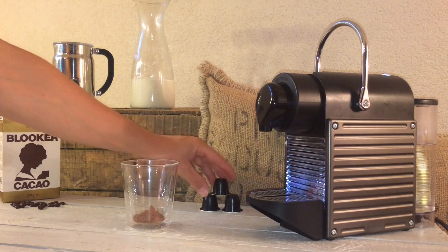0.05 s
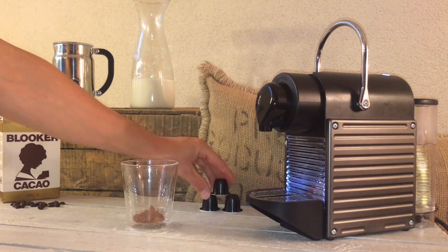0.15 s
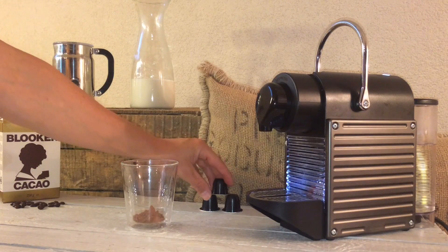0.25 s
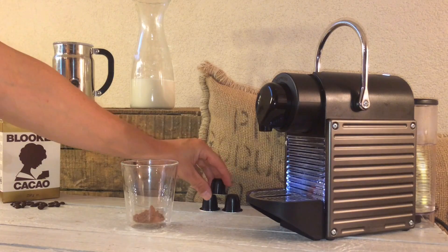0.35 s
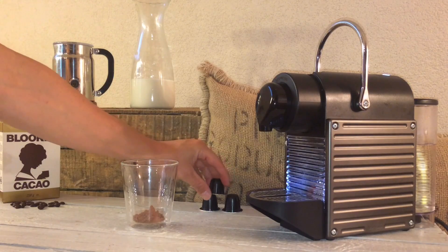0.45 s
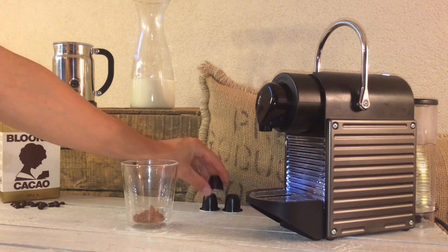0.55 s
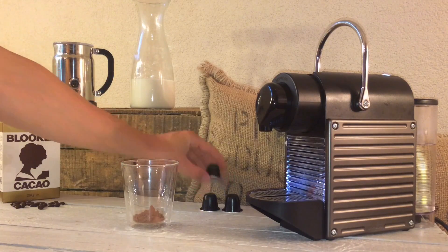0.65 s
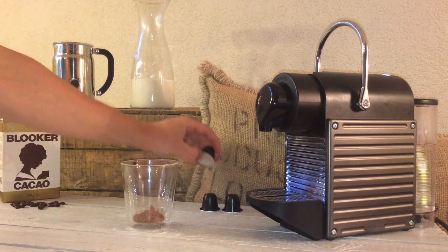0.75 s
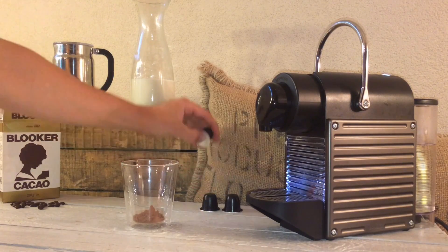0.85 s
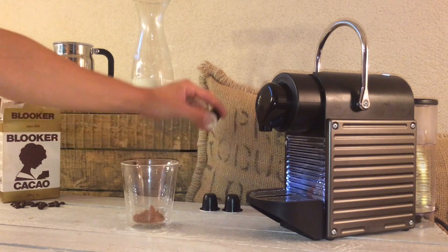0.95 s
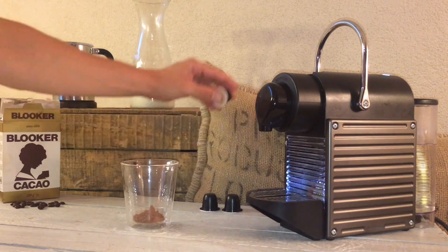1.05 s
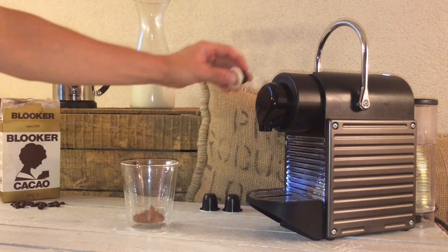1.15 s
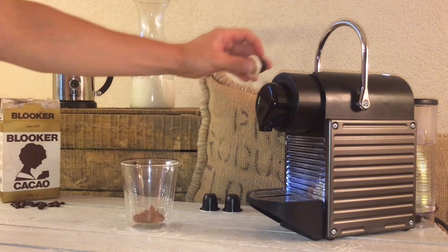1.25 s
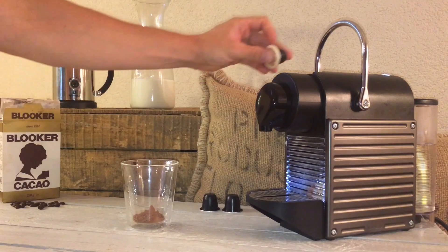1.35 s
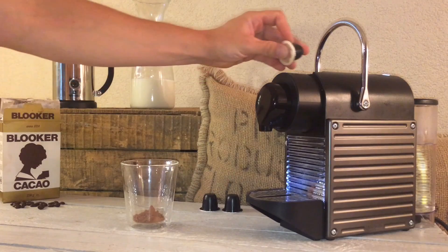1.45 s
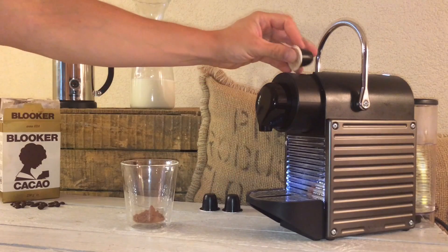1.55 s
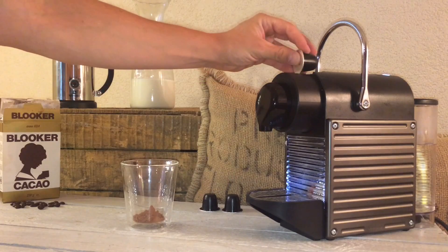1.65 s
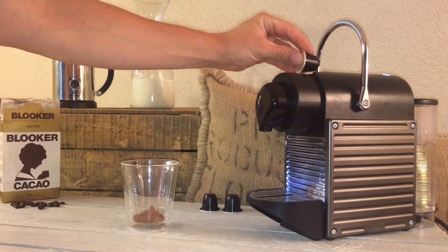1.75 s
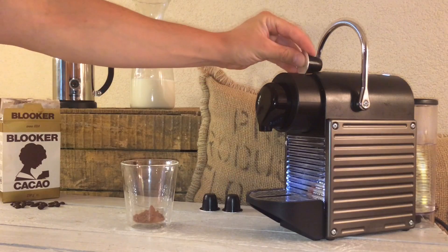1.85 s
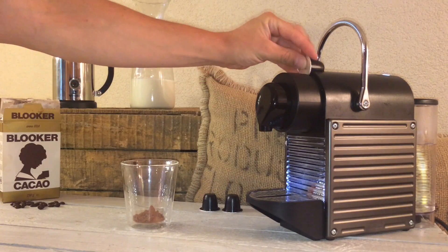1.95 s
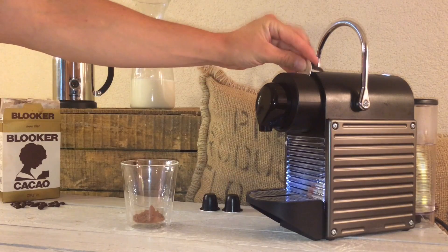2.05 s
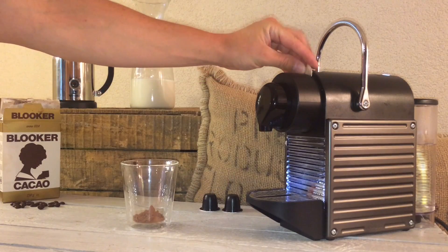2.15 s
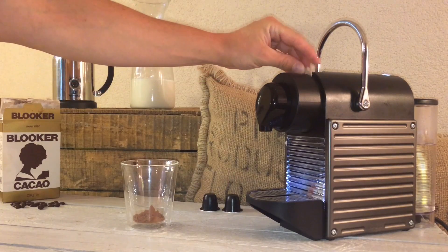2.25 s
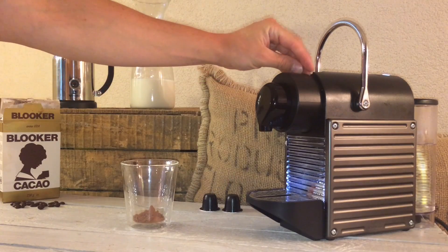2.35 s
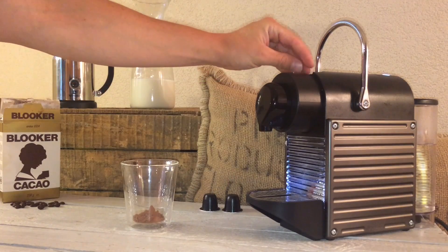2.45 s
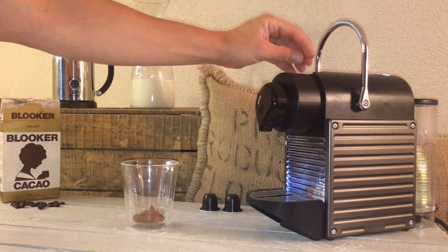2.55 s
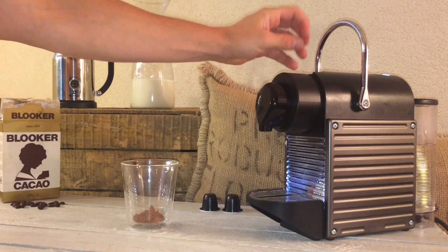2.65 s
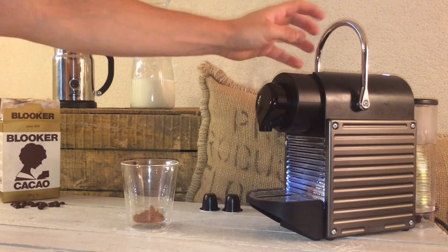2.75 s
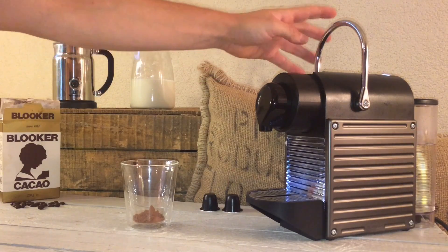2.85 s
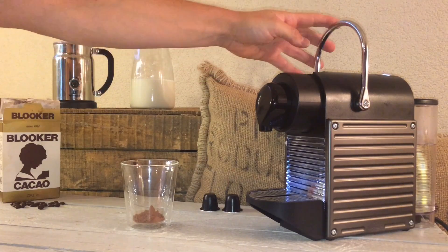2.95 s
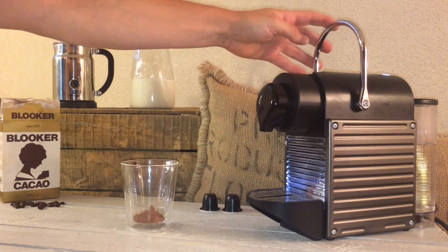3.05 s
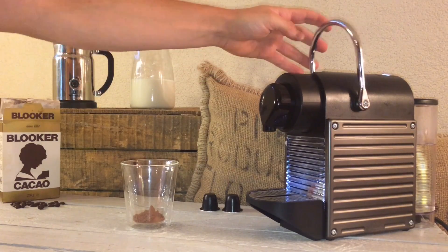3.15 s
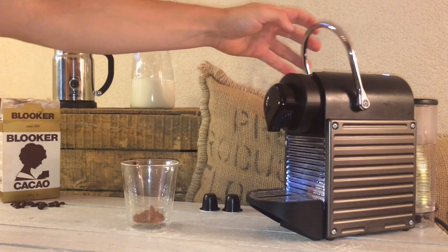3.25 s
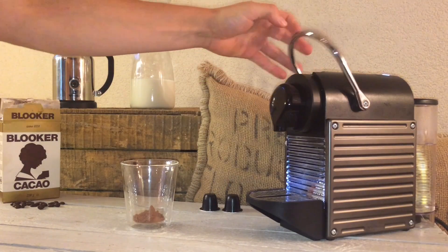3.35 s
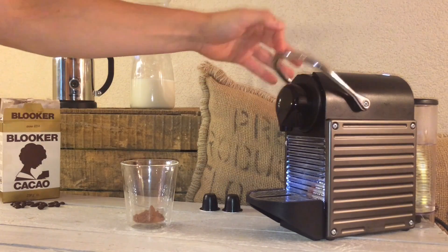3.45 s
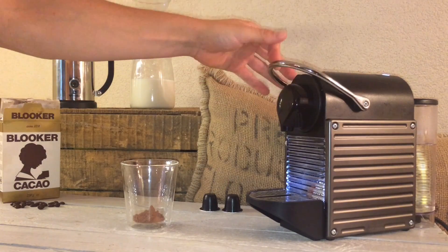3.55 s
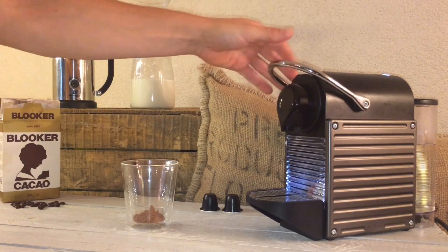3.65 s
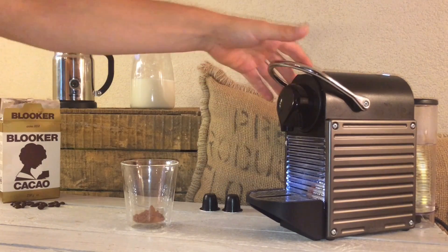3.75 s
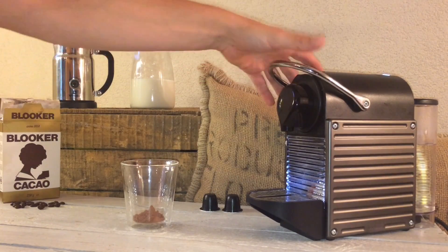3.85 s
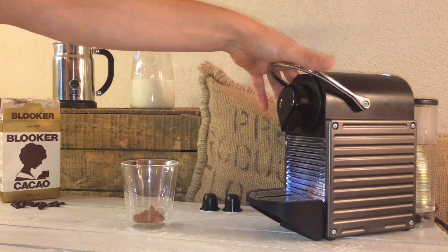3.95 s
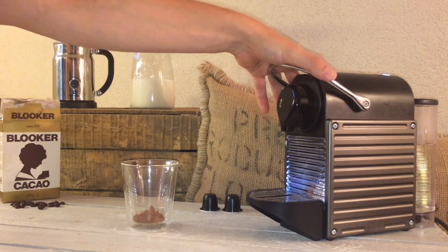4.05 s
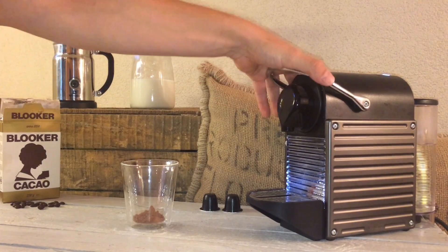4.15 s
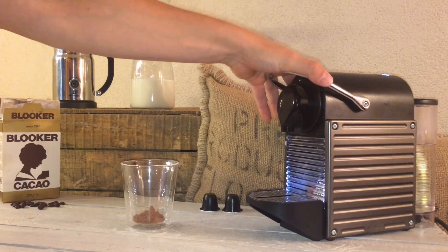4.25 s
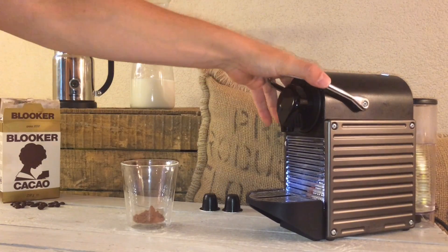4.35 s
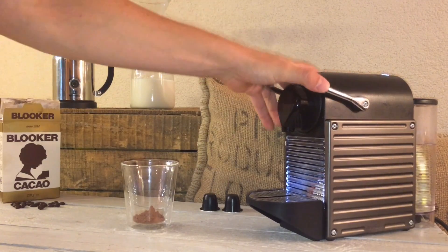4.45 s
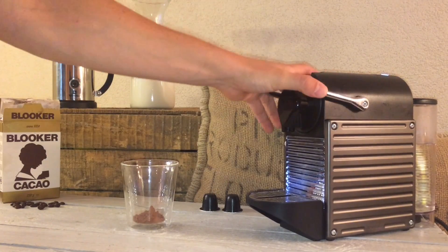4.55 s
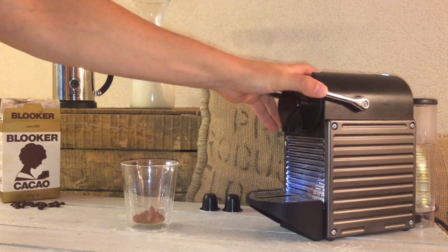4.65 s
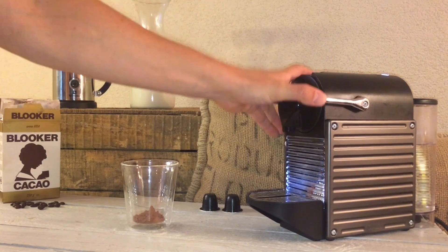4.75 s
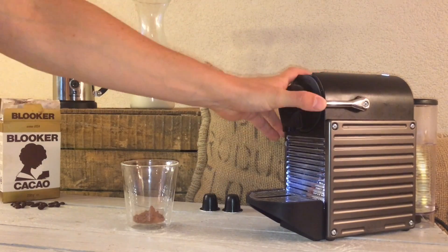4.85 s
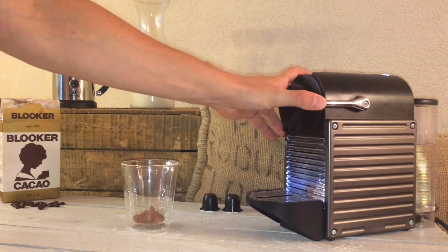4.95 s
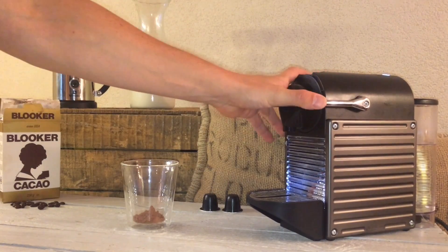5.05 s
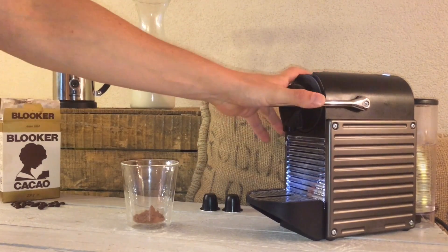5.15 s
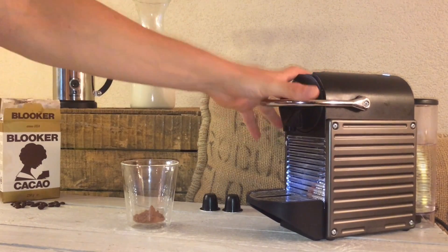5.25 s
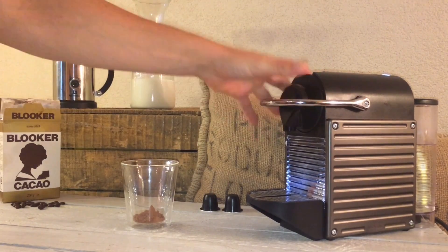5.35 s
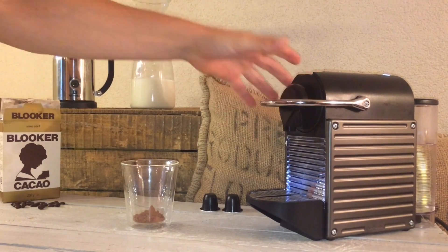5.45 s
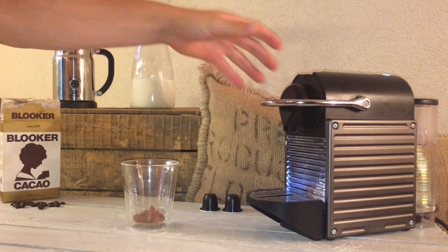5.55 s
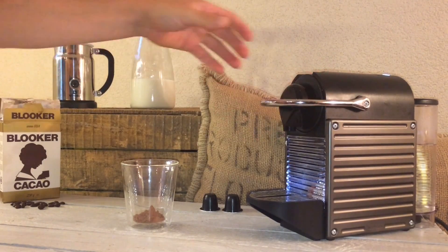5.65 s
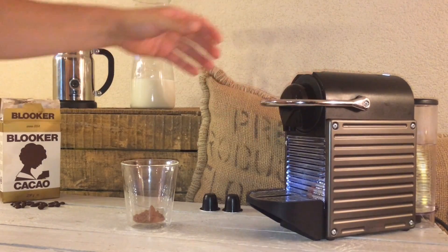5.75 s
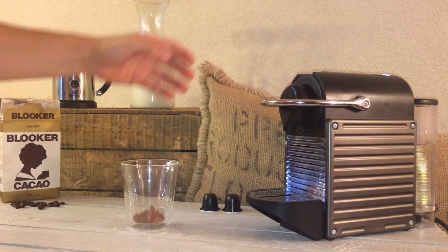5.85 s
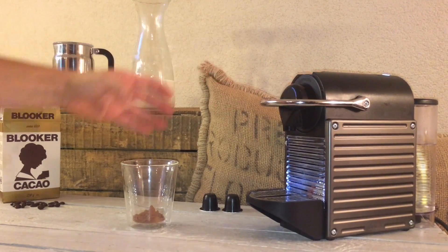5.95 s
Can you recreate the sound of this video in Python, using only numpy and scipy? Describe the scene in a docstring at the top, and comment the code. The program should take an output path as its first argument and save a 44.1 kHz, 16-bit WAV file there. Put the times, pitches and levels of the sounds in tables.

```python
"""Capsule into the coffee machine

A hand lifts a plastic capsule from a kitchen counter, drops it into the slot of a coffee machine and pulls the
steel lever shut. Capsule, lever and latch knock as noise bursts through resonances; the brewing head slides and
scrapes (grainy noise) and creaks (stick-slip pulses) in its plastic housing. The machine rocks on the counter,
a small hard room answers with decaying noise, and low rumble and microphone hiss lie beneath."""
import sys
import numpy as np
from scipy import signal
from scipy.fft import rfft, irfft
from scipy.io import wavfile
from scipy.ndimage import uniform_filter1d

SR = 44100
rng = np.random.default_rng(int(sys.argv[2]) if len(sys.argv) > 2 else 0)


def wav_out(sig):
    """Save sig, one row per channel (or a flat mono array), as 16-bit PCM at SR to the path in sys.argv[1]."""
    wavfile.write(sys.argv[1], SR, np.round(np.clip(np.atleast_2d(sig).T, -1, 1) * 32767).astype(np.int16))


N = 264600

# Background spectrum, relative: f/Hz, density/dB
FLOOR = [(21, -32), (35, -3.5), (154, -2.5), (214, -5.5), (243, -10.5), (314, -12), (375, -11.5),
         (437, -13.5), (691, -18), (1040, -20), (1310, -20.5), (1410, -20.5), (1560, -22), (15500, -32)]
FLOOR_DB = -68.5  # rms of rumble and hiss together, before the rumble swells
# Swell of the rumble, relative to its mean over the last half second: t/s, level/dB
RUMBLE = [(0, -66.5), (.25, -66), (.45, -64.5), (2.0, -65), (2.7, -65.5), (3.5, -62.5), (4.0, -65.5),
          (5.4, -66.5), (6, -67.5)]

# Strokes of sliding parts: t/s, length/s, scrape/dB, rasp/dB, hiss/dB, time to swell by SWELL_DB/s
SLIDES = [(.06, 0.094, -78, -78.5, -98, .1), (.28, 0.334, -76, -84, -99, 0.12),
          (.93, 0.067, -93, -81, -74.5, .04), (1.725, .02, -60, -66, -75, .008),
          (1.88, 0.024, -65, -78, -75, 0.033), (2.072, 0.025, -56.5, -73, -76.5, 0.0036),
          (2.148, 0.13, -61.5, -73.5, -74.5, .05), (2.365, 0.0088, -52, -66, -63.5, 0.026),
          (2.413, 0.017, -61, -59, -55, 0.029), (3.086, 0.018, -49.5, -64, -63, .008),
          (3.136, .18, -68, -71.5, -76, .03), (3.397, 0.064, -61.5, -64.5, -68, 0.27),
          (3.436, 0.016, -53, -73, -69, .02), (3.509, 0.083, -58, -67.5, -61, 0.22),
          (3.57, 0.0087, -53, -60, -62, 0.009), (4.156, 0.088, -52.5, -72.5, -73.5, .006),
          (4.256, .09, -43, -60, -58.5, 0.0067), (4.37, 0.09, -42.5, -68.5, -70, .03),
          (4.49, 0.15, -55.5, -60.5, -78, 0.04), (4.62, 0.054, -40, -60, -72, .03),
          (4.78, 0.024, -45.5, -63, -72, .015), (4.85, 0.0033, -40.5, -50, -41, .003),
          (4.872, 0.057, -50.5, -64, -63, .02), (5.303, .11, -72, -90, -94, .05)]
SWELL_DB = 30
# Fades of scrape, rasp and hiss: rate/(dB/s)
SLIDE_FADE_DB_S = (262, 299.5, 449)
# Resonances of the plastic housing: f/Hz, width/Hz, level/dB
HOUSING = [(119.5, 10, -26), (233, 52, -6.5), (346.3, 45, -1.5), (442.3, 94, -2.5), (657.7, 63, 0.5),
           (807, 63, -2.5), (943, 76.5, 0.5), (1245, 160, -8), (1342, 86, -9.5), (1574, 250, -14),
           (2396, 1120, -43), (3240, 330, -36.5)]
# Resonances that colour the rasp, then the hiss: f/Hz, width/Hz, level/dB
RASP = [(2060, 1950, 2.5), (2910, 320, 5.5), (3414, 500, 0)]
HISS = [(4946, 3050, -2), (7500, 1600, 1.5), (11600, 9500, -4.5)]
HISS_TILT = [(8850, 22000, 0)]

# Echo of the kitchen: band centre f/Hz, t60/s, level of the noise before its band filter/dB
ROOM = [(297, .45, -6.5), (940, 0.36, -12.5), (3000, 0.48, -9), (7000, 0.26, -13), (11500, 0.25, -16)]

# Knocks: t/s, peak level of low, middle and high modes/dB (three columns),
# f favoured by the struck spot/Hz, decay time constant of the low chatter/ms
CAPSULE_HITS = [(0.282,-60.5,-78,-77,1300,12), (0.459,-69,-62,-63,4630,2.7), (0.498,-60,-65.5,-76,800,11),
                (0.889,-64,-59,-56,7000,5), (0.898,-65,-51,-40.5,7500,9.2), (1.077,-75,-58,-63,3900,2.2),
                (1.721,-38,-39,-42.5,494,8.3), (1.877,-55,-60.5,-76,950,20), (2.068,-48,-69,-67,1140,5),
                (2.082,-43,-59.5,-74,580,7.8), (2.24,-48,-45.5,-45.5,820,6.7), (2.361,-51,-55,-68,697,3),
                (2.37,-43,-47,-63,1400,6.1), (2.401,-44,-58,-56,921,1.5), (2.422,-32,-29.5,-40,3260,5.3),
                (2.437,-21.5,-36.5,-32.5,1100,2.2), (2.447,-30.5,-36,-52,3240,4.7),
                (2.459,-36.5,-44,-49,3240,8.2)]
LEVER_HITS = [(3.080, -38, -57, -46, 870, 5.5), (3.087, -56, -58, -45.5, 11000, 3.5),
              (3.109, -36, -46, -45, 654, 5.4), (3.1195, -41, -27.5, -31.5, 1300, 4.5),
              (3.127, -58, -37, -58, 2500, 14), (3.254, -52, -72, -66, 800, 5.2),
              (3.420, -35.5, -57, -58, 1210, 7.8), (3.432, -35.5, -63, -64, 1200, 2.4),
              (3.569, -35.5, -46, -59, 900, 1.7), (5.374, -67, -74, -79, 1140, 3.3),
              (5.443, -58.5, -62.5, -61, 1210, 1.8)]
LATCH_HITS = [(4.157,-41.5,-64.5,-67.5,586,4), (4.165,-43,-38.5,-29.5,11200,3.4),
              (4.2562,-28.5,-46.5,-11,6730,1.9), (4.303,-32.5,-31,-25.5,5300,6.4),
              (4.342,-28.5,-34.5,-36.5,638,3.6), (4.388,-34.5,-37,-45,3200,5), (4.582,-36.5,-60,-71,900,3),
              (4.7635,-14.5,-38,-32.5,1152,1.5), (4.768,-23,-45,-49.5,904,1.7),
              (4.851,-23,-29.5,-21.5,11500,2.4), (4.899,-34.5,-46,-56,521.2,5),
              (4.935,-49,-41.5,-36,11000,1.3), (4.947,-42.5,-47,-62,1138,3.9)]
# Resonances of each struck object: f/Hz, width/Hz, level/dB
CAPSULE = [(261, 21, 4.5), (548, 28, -6), (1030, 91, -11), (775, 130, 3.5), (1378, 99, 7), (2116, 200, 3.5),
           (2670, 150, -4.5), (3240, 158, 3), (3850, 910, -5.5), (6390, 810, -13), (7900, 1600, -15.5),
           (11500, 14000, -12.5)]
LEVER = [(403, 80, -16), (630, 140, 1.5), (920, 120, 4.5), (1100, 170, 0), (1300, 82, 4), (1985, 210, 1),
         (2360, 500, -3), (3000, 270, 1), (3370, 570, -2), (4380, 170, -20), (5030, 950, 17),
         (6370, 1000, 15), (9500, 4500, 11.5), (13500, 3000, -5)]
LATCH = [(340, 43, 0), (430, 130, 0.5), (663.3, 90, 0.5), (942, 240, 0.5), (1137, 140, 1.5),
         (1550, 820, -11.5), (1980, 450, -2.5), (2760, 130, -0.5), (3530, 660, -0.5), (4496, 720, -5),
         (5493, 600, 1.5), (6480, 300, -5.5), (6510, 430, 3), (8400, 1200, -7.5), (10040, 2100, -9.5),
         (13260, 3400, -10), (14560, 1500, -4.5)]
# Pitch each object favours in a group that does not hold the struck spot's pitch: low, middle, high f/Hz
CAPSULE_HZ = (1130, 2220, 6400)
LEVER_HZ = (950, 2460, 5970)
LATCH_HZ = (850, 2410, 7500)
# Borders between low, middle and high modes: f/Hz
BAND_EDGES_HZ = 1800, 4500
# Low, middle and high modes radiate little above these: f/Hz
REACH_HZ = 2500, 6700, 19220

# The machine rocks on the counter as the hand leans on the lever: t/s, length/s, level/dB
ROCKING = [(3.06, .1, -69), (3.58, .05, -63), (4.35, 0.0088, -53), (4.7, .1, -61), (4.9, 0.066, -47.5)]
ROCK_RISE_DB_S, ROCK_FADE_DB_S = 129, 134.5
# The machine thumps down on the counter: t/s, peak level/dB
THUMPS = [(3.113, -50.5), (3.259, -53), (3.621, -48), (4.769, -51), (4.903, -42), (4.991, -45)]
# Resonances of the counter top: f/Hz, width/Hz, level/dB
COUNTER = [(80.6, 20, -9.5), (122, 14, -1), (162, 30, -8), (210.4, 8, 0.5)]

# Bouts of stick-slip in the hinge: t/s, length/s, knocks of the slips/dB, hum at the slip rate/dB
CREAKS = [(4.335, 0.077, -38.5, -67), (4.41, .03, -48, -49.5), (4.447, .042, -42, -40.5),
          (4.515, 0.053, -54, -46.5), (4.585, 0.023, -57, -52), (4.623, .06, -32, -44.5),
          (4.69, 0.035, -54.5, -49), (4.77, 0.017, -31, -30.5), (4.795, 0.038, -54, -64)]
CREAK_RISE_DB_S, CREAK_FADE_DB_S = 1501, 2200
# How fast the hinge slips: t/s, slips per second f/Hz
SLIP_RATE = [(4.30, 200.6), (4.40, 220), (4.47, 326), (4.57, 359), (4.60, 409), (4.625, 331), (4.65, 325),
             (4.685, 300), (4.74, 335), (4.764, 442), (4.84, 457)]

TOP_HZ = 15300  # the recorder's upper limit


def undb(db):
    """dB to amplitude gain."""
    return 10 ** (np.asarray(db) / 20)


def unit(x):
    """Scale to rms 1."""
    return x / np.sqrt(np.mean(x ** 2))


def ring(x, modes):
    """Excite resonances in parallel, neighbours in opposite phase."""
    out = 0
    for k, (hz, width_hz, db) in enumerate(modes):
        b, a = signal.iirpeak(hz, hz / width_hz, SR)
        out = out + (-1) ** k * undb(db) * signal.lfilter(b, a, x)
    return out


def soften(x, hz):
    """Rounded contact: little force above hz."""
    return signal.sosfilt(signal.butter(2, hz, fs=SR, output="sos"), x)


def walk(rate_hz):
    """Glide between random levels, rate_hz new ones a second, with a spread near 1."""
    k = int(SR / rate_hz)
    held = np.repeat(rng.standard_normal(N // k + 1), k)
    return uniform_filter1d(held, k)[:N]


def bouts(rows, column, rise_db_s, fade_db_s):
    """Gain over time: each row swells to its level, holds it for its length and fades."""
    t = np.arange(0, N, 16) / SR  # coarse time grid
    rows = np.array(rows)
    start = rows[:, :1]
    end = start + rows[:, 1:2]
    rise_db = rise_db_s * np.maximum(start - t, 0)
    fade_db = fade_db_s * np.maximum(t - end, 0)
    gains = undb(rows[:, [column]] - rise_db - fade_db)
    total = np.sqrt(np.sum(gains ** 2, axis=0))
    return np.interp(np.arange(N) / SR, t, total)


def background():
    """Shaped noise: steady hiss over a rumble whose level wanders."""
    hz = np.fft.rfftfreq(N, 1 / SR)
    floor_hz, floor_db = np.array(FLOOR).T
    colour = undb(np.interp(np.log(hz + 1), np.log(floor_hz), floor_db))
    spectrum = rfft(rng.standard_normal(N)) * colour
    low_share = 1 / (1 + (hz / 600) ** 2)  # rumble gives way to hiss around 600 Hz
    rumble = irfft(spectrum * low_share, N)
    hiss = irfft(spectrum * (1 - low_share), N)
    swell_db = np.interp(np.arange(N) / SR, *np.array(RUMBLE).T)
    swell = undb(swell_db + 1.2 * walk(9))
    swell = swell / swell[-N // 12:].mean()
    return undb(FLOOR_DB) * (rumble * swell + hiss) / np.std(rumble + hiss)


def slides():
    """Dense uneven grains of friction ring the housing; finer ones rasp, the finest hiss."""
    grains = rng.standard_normal(N) * (rng.random(N) < .1)  # one sample in ten
    scrape = ring(soften(grains * undb(2.5 * walk(150)), 3000), HOUSING)
    rasp_noise = rng.standard_normal(N) * undb(2 * walk(200))
    rasp = ring(ring(rasp_noise, RASP), RASP)  # twice, for sharper peaks
    hiss = ring(ring(grains * undb(2.2 * walk(200)), HISS), HISS_TILT)
    rise_db_s = SWELL_DB / np.array(SLIDES)[:, 5:]
    out = np.zeros(N)
    for k, layer in enumerate([scrape, rasp, hiss]):
        out += bouts(SLIDES, 2 + k, rise_db_s, SLIDE_FADE_DB_S[k]) * unit(layer)
    return out


def room(x):
    """Diffuse answer of the walls: noise dying away band by band."""
    t = np.arange(SR // 2) / SR
    tail = 0
    for hz, t60, db in ROOM:
        band = signal.butter(2, [hz / 1.8, hz * 1.8], "bandpass", fs=SR, output="sos")
        noise = signal.sosfilt(band, rng.standard_normal(len(t)))
        decay = np.exp(-np.log(1000) * t / t60) * np.clip(t / 0.002, 0, 1)  # 2 ms onset
        tail = tail + undb(db) * noise * decay / np.sqrt(np.sum(decay ** 2))
    return signal.fftconvolve(x, tail)[:N]


def knocks(hits, modes, usual_hz, focus_db, scatter_db=2.0):
    """Brief noisy chatter rings the modes; those off the favoured pitch lose focus_db an octave."""
    t = np.arange(8192) / SR
    out = np.zeros(N + len(t))
    modes = np.array(modes)
    group = np.searchsorted(BAND_EDGES_HZ, modes[:, 0])  # 0 low, 1 middle, 2 high
    for s, *peaks_db, spot_hz, chatter_ms in hits:
        spot_group = np.searchsorted(BAND_EDGES_HZ, spot_hz)
        favoured_hz = np.where(group == spot_group, spot_hz, np.array(usual_hz)[group])
        octaves_off = np.abs(np.log2(modes[:, 0] / favoured_hz))
        struck = modes.copy()
        struck[:, 2] += scatter_db * rng.standard_normal(len(modes)) - focus_db * octaves_off
        noise = rng.standard_normal(len(t))
        noise[0] = 1.0  # the first contact always has the same force
        at = int(s * SR)
        for k, db in enumerate(peaks_db):
            # the treble of the chatter dies first
            chatter = noise * np.exp(-t * 1000 * (1 + 0.13 * k) / np.clip(chatter_ms, .1, 30))
            sound = soften(ring(chatter, struck[group == k]), REACH_HZ[k])
            out[at:at + len(t)] += undb(db) * sound / np.abs(sound).max()
    return out[:N]


def capsule_knocks():
    """The light plastic capsule rings as it is handled and dropped into the slot."""
    return knocks(CAPSULE_HITS, CAPSULE, CAPSULE_HZ, focus_db=14.4)


def rocking(push_ms=4.7):
    """Uneven noise judders the counter top; soft pushes ring it as thumps."""
    noise = rng.standard_normal(N) * undb(2.9 * walk(40))
    judder = bouts(ROCKING, 2, ROCK_RISE_DB_S, ROCK_FADE_DB_S) * unit(ring(noise, COUNTER))
    t = np.arange(SR // 2) / SR
    thump = ring(t * np.exp(-t * 1000 / push_ms), COUNTER)
    starts = np.zeros(N)
    for s, db in THUMPS:
        starts[int(s * SR)] = undb(db)
    return judder + signal.fftconvolve(starts, thump / np.abs(thump).max())[:N]


def lever_knocks():
    """The steel lever rings, each knock strongly focused on its favoured pitches."""
    return knocks(LEVER_HITS, LEVER, LEVER_HZ, focus_db=21.5)


def latch_knocks():
    """The latch clacks through many modes, reaching far into the treble."""
    return knocks(LATCH_HITS, LATCH, LATCH_HZ, focus_db=15.0)


def creaks(jitter=.022, size_db=4.0):
    """One slip per cycle of a wavering rate knocks the housing, which also hums along at that rate."""
    slip_s, slip_hz = np.array(SLIP_RATE).T
    rate = np.interp(np.arange(N) / SR, slip_s, slip_hz) * (1 + jitter * walk(120))
    cycles = np.cumsum(rate) / SR
    slips = np.diff(np.floor(cycles), prepend=0)  # a pulse as each cycle completes
    slips = slips * undb(size_db * rng.standard_normal(N))
    knock = ring(soften(slips - slips.mean(), 2000), HOUSING)
    hum = np.sin(2 * np.pi * cycles) * undb(0.86 * walk(70))
    out = np.zeros(N)
    for k, layer in enumerate([knock, hum]):
        out += bouts(CREAKS, 2 + k, CREAK_RISE_DB_S, CREAK_FADE_DB_S) * unit(layer)
    return out


def scene():
    """All contacts close by, their echo in the kitchen, and the background."""
    hits = capsule_knocks() + lever_knocks() + latch_knocks()
    near = hits + slides() + creaks() + rocking()
    return (near + room(near) + background())[None]


def record(dry):
    """The microphone loses the deepest bass and the recorder cuts the top."""
    thin = signal.sosfilt(signal.butter(2, 36, "highpass", fs=SR, output="sos"), dry)
    return signal.sosfilt(signal.ellip(8, .2, 60, TOP_HZ, fs=SR, output="sos"), thin)


dry = scene()
out = record(dry)
wav_out(out)
```